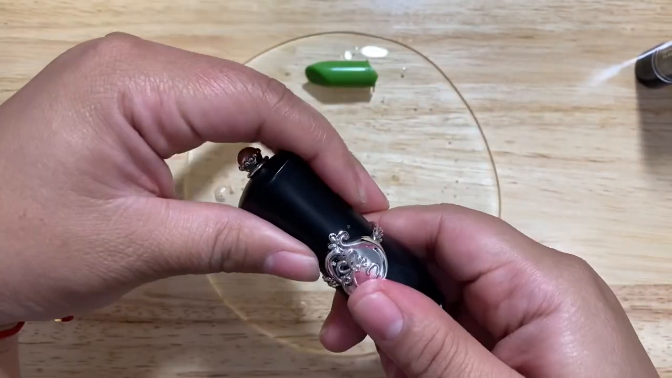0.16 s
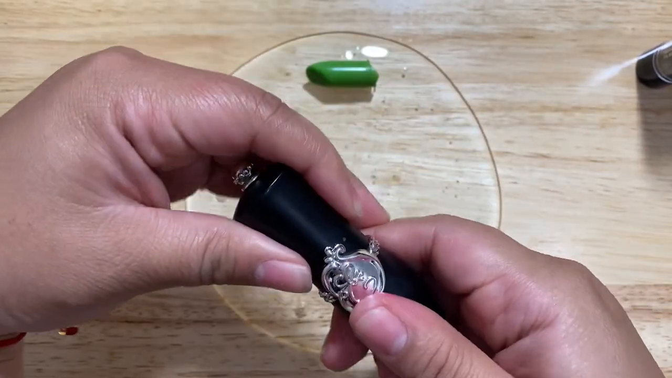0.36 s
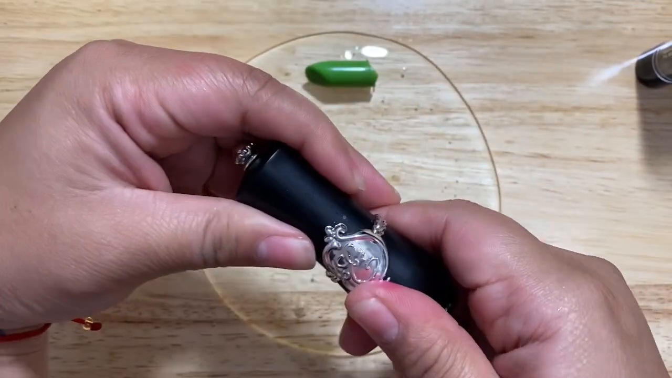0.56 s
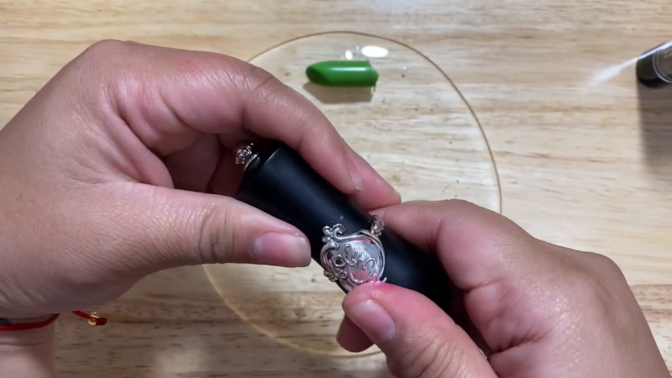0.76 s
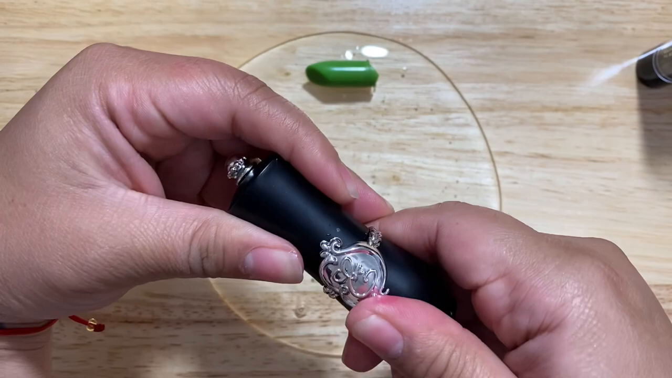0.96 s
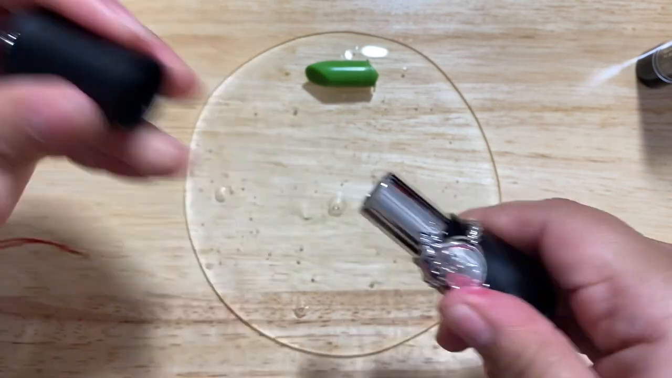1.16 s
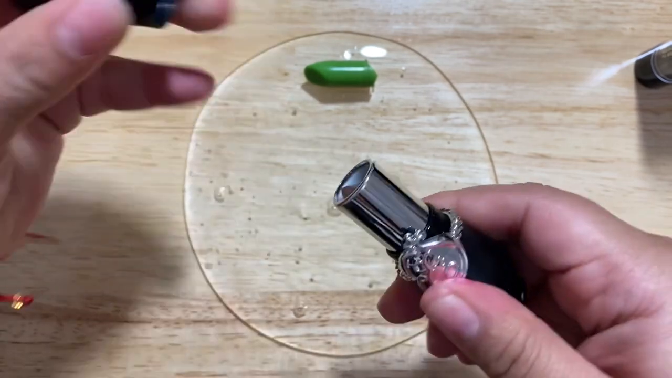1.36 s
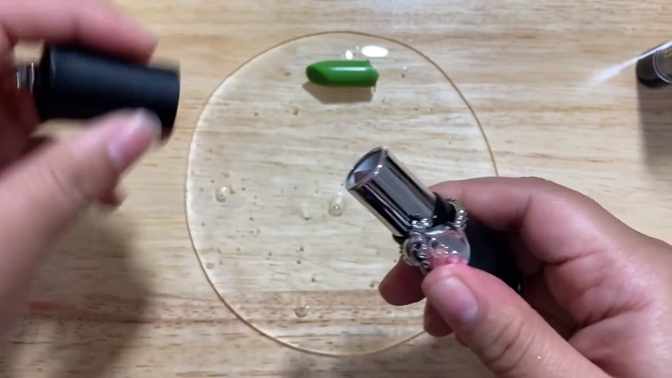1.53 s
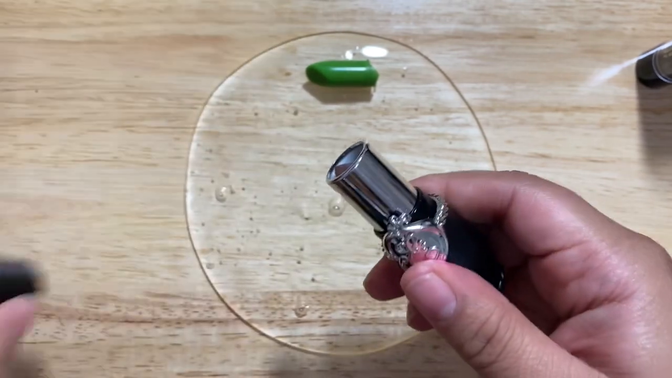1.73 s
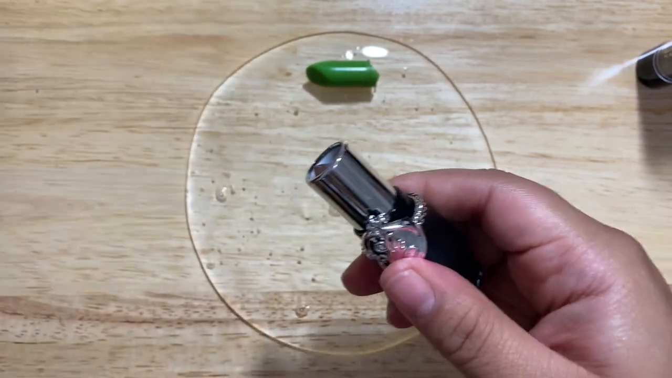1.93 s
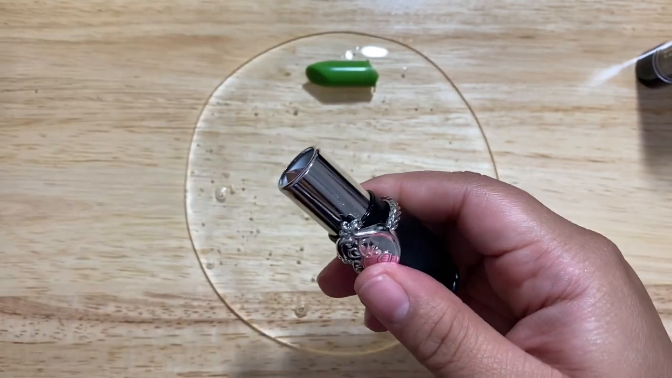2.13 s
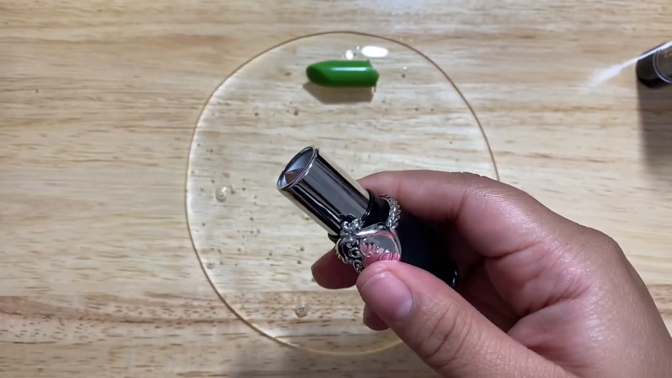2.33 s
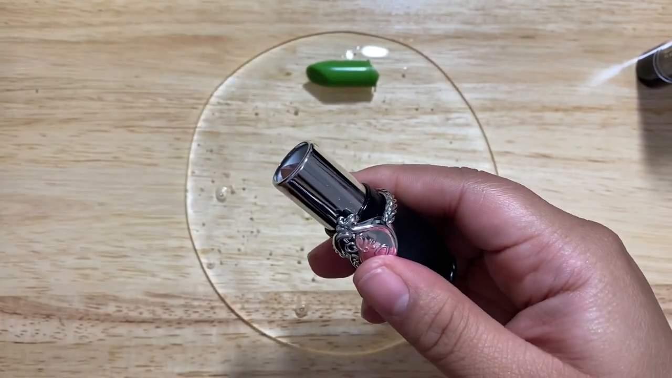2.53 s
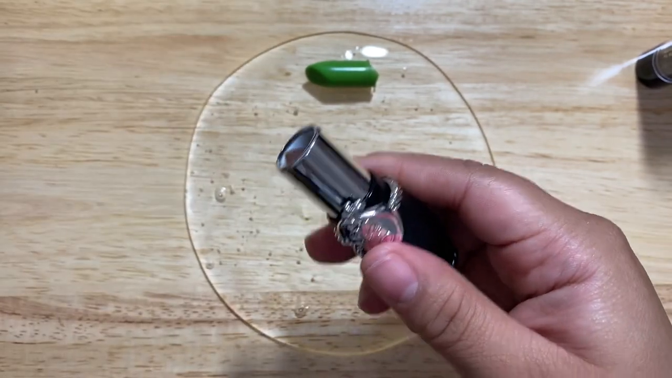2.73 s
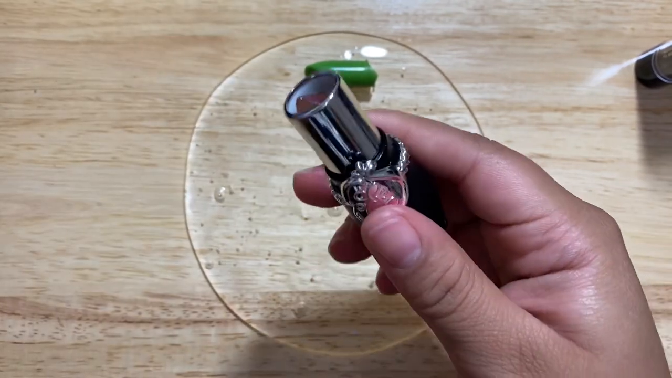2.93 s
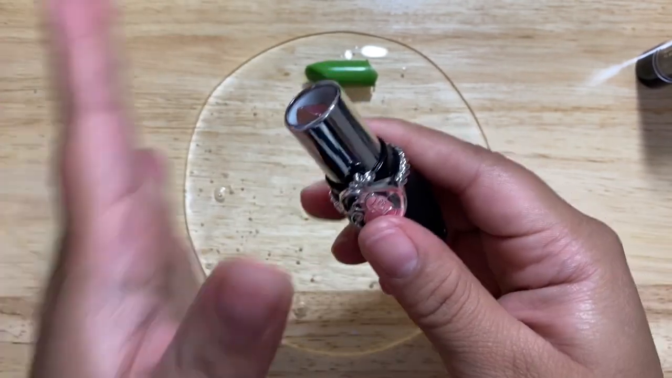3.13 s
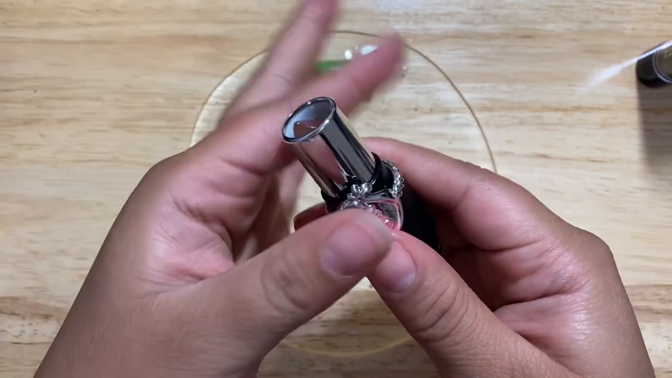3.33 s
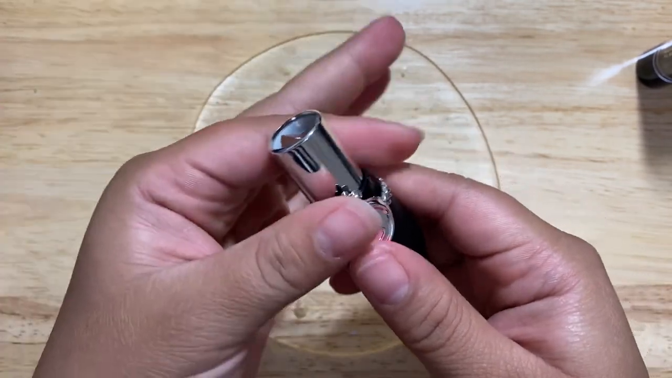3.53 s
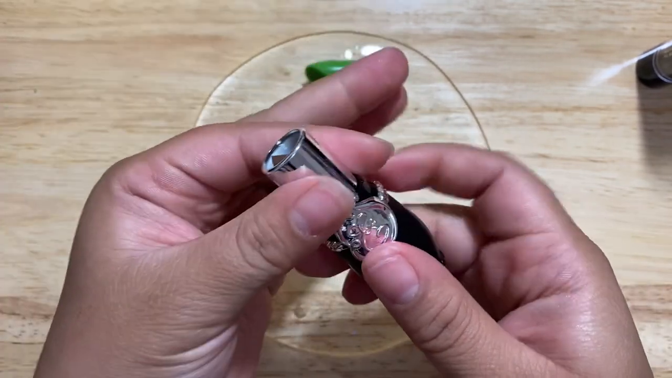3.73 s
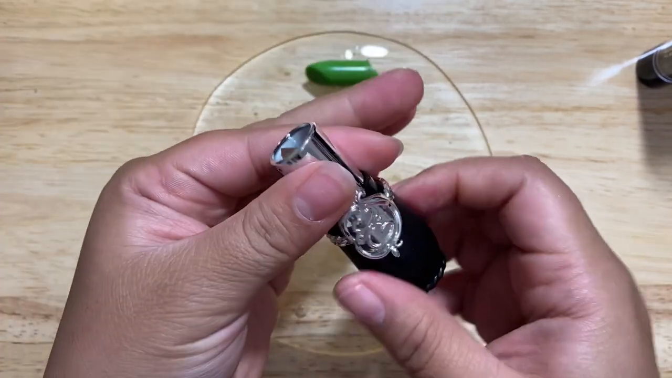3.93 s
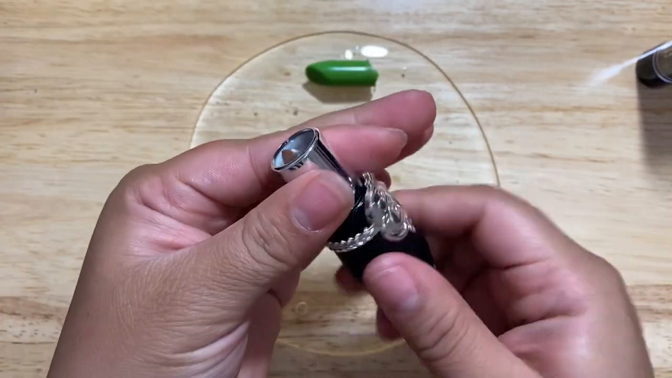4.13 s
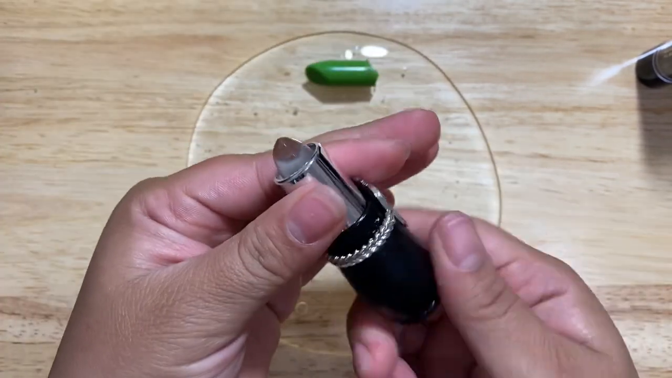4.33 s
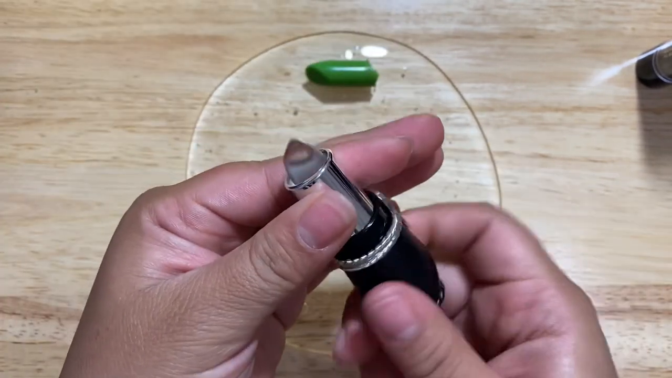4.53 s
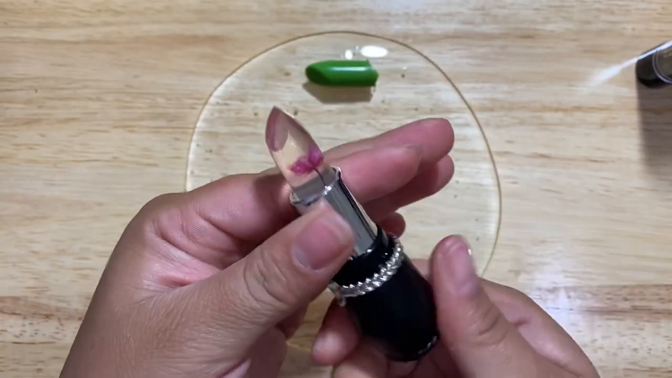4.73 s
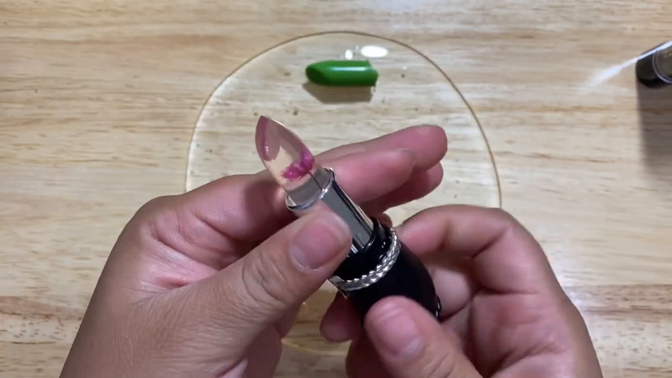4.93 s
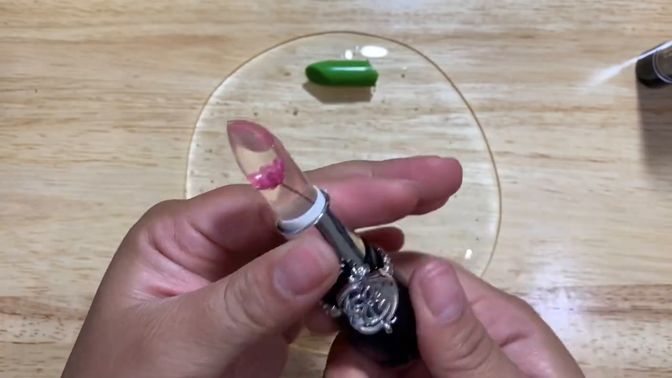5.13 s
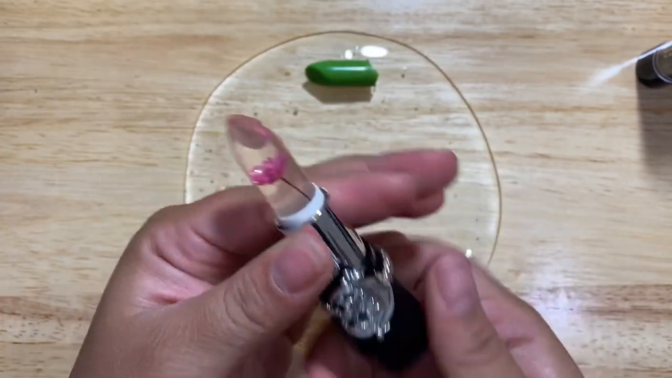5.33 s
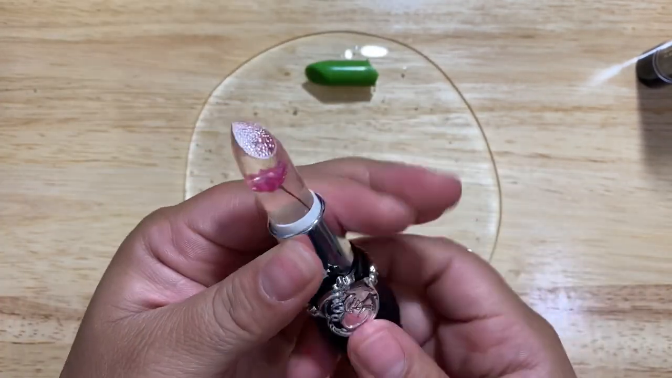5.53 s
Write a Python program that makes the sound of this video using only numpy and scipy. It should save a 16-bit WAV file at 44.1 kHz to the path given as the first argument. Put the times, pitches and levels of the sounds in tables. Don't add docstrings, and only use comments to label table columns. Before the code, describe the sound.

A quiet small room, heard close through a stereo phone microphone, with a low wavering hum and soft bassy air throughout. Faint clicks and light finger touches occur from 0.15 to 0.55 s. At 0.8 s the cap creaks with a firm dull squeeze; around 0.98 s several sharp cracks crowd into a hollow airy pop, the main loud event with 2.15 s, followed by a loosening click at 1.01 s. Dull double bumps come at 1.26 s, with faint skin scraping to about 1.7 s. A bright metallic tap at 1.86 s begins the cap's landing on wood: hollow rocking knocks near 1.95 s, a strong low table thud with quick rebounds at 2.15 s, smaller knocks to 2.4 s. Then it is nearly still. Tiny ticks gather from 3.5 to 3.95 s, and fine hissing twists come in short strokes around 4.0-4.25, 4.5-4.7 and 4.9-5.25 s, with a faint click at 4.99 s. Echoes are short and abruptly cut.

```python
import sys
import numpy as np
from scipy import signal
from scipy.fft import rfft, irfft, next_fast_len
from scipy.io import wavfile
from scipy.ndimage import uniform_filter1d

SR = 44100
rng = np.random.default_rng(int(sys.argv[2]) if len(sys.argv) > 2 else 0)


def nominal_scale(level):
    x = np.asarray(level, float) / 20
    return 10 ** x


def put_to_file(sound):
    columns = np.atleast_2d(sound).T
    safe = np.clip(columns, -1, 1)
    whole_steps = np.round(safe * 32767)
    wavfile.write(sys.argv[1], SR, whole_steps.astype(np.int16))


N = 245637


def evened(x):
    return x / np.sqrt(np.mean(x ** 2) + 1e-20)


def read(points, hz):
    f, value = np.transpose(points)
    return np.interp(np.log(hz + 1), np.log(f + 1), value)


def add(mix, s, sound):
    part = mix[..., round(s * SR):][..., :sound.shape[-1]]
    part += sound[..., :part.shape[-1]]


def ringing(modes, size, soft):
    t = np.arange(size) / SR
    ring = np.zeros(size)
    for k, (hz, width, db) in enumerate(modes):
        envelope = (width * t) ** soft * np.exp(-np.pi * width * t)
        ring += (-1) ** k * nominal_scale(db) * envelope * np.sin(2 * np.pi * hz * t)
    return ring


def struck(x, ring):
    y = signal.fftconvolve(np.atleast_2d(x), ring[None], axes=1)[:, :len(ring)]
    return y / abs(y).max()


DULLED_DB = [-7.5, 3.5, 0.5]


def clicks(rows, case):
    size = 500
    near, far, t = np.zeros((2, N)), np.zeros(N), np.arange(size) / SR
    edge, tube, shell = case[4:], case[2:4], case[:2]
    rings = [ringing(modes, size=size, soft=0.91) for modes in (edge, tube, shell)]
    small = signal.butter(4, 1200, "high", fs=SR, output="sos")
    rings = signal.sosfilt(small, rings)
    shape = (t / 0.00059) ** 2 * np.exp(-t / 0.00036) + .06 * np.exp(-t / 0.0044)
    crackle = rng.standard_normal((len(rows), 2, size)) * shape
    snap = 1.4 * (np.arange(size) == [[20], [22]])
    for (s, db, edge_db, shell_db, room_db), (shared, other) in zip(rows, crackle):
        crack = snap + np.array([shared, 0.8 * shared + other])
        parts_db = np.array([edge_db, 0, shell_db])
        close = sum(nominal_scale(db + 9.0 + d) * struck(crack, r) for d, r in zip(parts_db, rings))
        add(near, s, nominal_scale([[-1.2], [1.2]]) * close)
        for part_db, ring in zip(parts_db + DULLED_DB, rings):
            add(far, s, nominal_scale(db + 10.0 + room_db + part_db) * ring / ring[abs(ring).argmax()])
    return near, far


# start in seconds, tube peak (3-8 kHz) in dB,
# then edge (8-16 kHz), shell (1-3 kHz) and room, all in dB relative to the tube.
SEAL = [
    (.7923, -55.5, 13, 2, -8),
    (.7940, -50.5, 8, -1.5, -5.5),
    (.9757, -48.5, 7, -2, -8.5),
    (.9804, -30.5, -2, -9, -16.5),
    (.9856, -34.5, 3.5, -6, -13),
    (.9874, -29.5, 10.5, -14.5, -13),
    (.9893, -39.5, -8, -9, -9),
]
CLICKS = [(0.148, -83, 1.5, 1, 0), (0.1968, -60, 3.5, -9, -9), (0.2254, -65, 5.5, -10, -16),
          (0.4097, -70, 11, 0.5, -14), (0.4455, -93, 24, 6, -14), (0.466, -77, -1, -28, -9.5),
          (0.487, -71, 11, -2, -3), (0.5182, -60, 1, 2, -12), (0.530, -88, 8, 3, -9),
          (0.5377, -79, 6, 7, 6), (0.8114, -48.5, 11, 7.5, -18.5), (0.946, -93, 2, -8, -5),
          (1.0104, -45.5, 6.5, 4.5, -11), (1.2027, -88, 12.5, 2.5, -9), (1.2589, -86, 18, 16, -7),
          (1.3647, -76.5, 16, 7, -20), (1.5494, -92, 9, 6, 7), (1.7135, -84.5, -1.5, 1.5, 2),
          (2.1454, -50, 3, -24, 3), (2.347, -59.5, -3, -4, -14), (2.3887, -63.5, -5, 4.5, -29),
          (2.488, -66, 8.5, -5, 10), (4.992, -67, -1, -7, -1.5)]
# pitch in Hz, width in Hz, level in dB.
CASE = [(2100, 1000, 6), (3100, 1600, 0.5), (4200, 2800, 4.5), (7020, 2700, -0.5), (8680, 560, 6),
        (10460, 2200, 4.5), (13200, 2500, 4), (15150, 2200, 0)]


def cap_clicks():
    return clicks(SEAL + CLICKS, CASE)


# start in seconds, peak in dB, pitch in Hz, number of cycles.
POPS = [
    (0.9819, -21, 320, 3),
    (0.9912, -25.5, 135, .8),
    (0.7965, -47, 220, 1.5),
    (0.8135, -44, 260, 1.5),
]


def pops():
    out = np.zeros(N)
    for s, db, hz, cycles in POPS:
        turns = np.arange(0, cycles, hz / SR)
        swell = np.sin(np.pi * turns / cycles) ** .5
        add(out, s, -nominal_scale(db) * np.sin(2 * np.pi * turns) * swell)
    return out


# start in seconds, tube peak in dB,
# then edge, shell and room in dB relative to the tube.
TAPS = [
    (1.8608, -36.5, 13, -7.5, -2.5),
    (1.863, -65, 1.6, 15.5, -4),
    (2.2928, -53, 9.9, -24, -9.5),
]
# pitch in Hz, width in Hz, level in dB.
RIM = [(2125, 450, 9), (1500, 400, 4.5), (4400, 870, 6), (5850, 2350, 2), (8400, 1400, 14),
       (12330, 4700, 12), (14300, 2800, 0.5), (13160, 1800, 5.5)]
RIM_RING = [(2013, 300, -6), (4400, 130, 4), (4840, 200, -6), (8050, 400, -0.5), (10300, 400, -7.5),
            (15520, 500, 7)]
RIM_RING_DB = -49


def rim_taps():
    near, far = clicks(TAPS, RIM)
    add(far, TAPS[0][0], nominal_scale(RIM_RING_DB) * ringing(RIM_RING, size=2000, soft=0))
    return near, far


# start in seconds, tube peak in dB, edge in dB relative to it.
TICKS = [(2.78, -77, 1), (3.5114, -94, 25.5), (3.516, -78.5, 11.5), (3.7187, -77, 12.5), (3.729, -75, 13),
         (3.7408, -84, 8), (3.779, -97, 15), (3.893, -86, 16), (3.9003, -59.5, 16), (3.9234, -56, 4),
         (3.936, -85, 13), (4.6833, -85, 8), (4.748, -91, 14), (5.101, -105, 13), (5.3723, -76, 5.5),
         (5.415, -74.5, -26.5)]
# pitch in Hz, width in Hz, level in dB.
THREAD = [(2620, 700, 9), (3700, 1000, 5.5), (5440, 1600, 4), (7170, 1150, -4.5), (8820, 730, 3),
          (10600, 1400, 1), (11840, 1300, -3), (15200, 3000, 9)]
TICK_SHELL_DB, TICK_ROOM_DB = -10, -14


def thread_ticks():
    ticks = [(*row, TICK_SHELL_DB, TICK_ROOM_DB) for row in TICKS]
    return clicks(ticks, THREAD)


def knocks(rows, modes):
    size = 4000
    near, far, t = np.zeros((2, N)), np.zeros(N), np.arange(size) / SR
    low, high = ringing(modes[:4], size=size, soft=0.48), ringing(modes[4:], size=size, soft=0.56)
    shape = (1 - np.exp(-t / 0.00062)) * np.exp(-t / 0.0014)
    rough = rng.standard_normal((len(rows), 2, size)) * shape
    contact = 7.0 * (np.arange(size) == 12)
    echo_low = low * np.exp(-t / 0.0049) / abs(low).max()
    echo_high = high * np.exp(-t / 0.0015) / abs(high).max()
    for (s, db, bright_db, pan_db, room_db), (shared, other) in zip(rows, rough):
        blow = contact + np.array([shared, 0.54 * shared + 0.8 * other])
        sound = nominal_scale(db) * (struck(blow, low) + nominal_scale(bright_db + 3.5) * struck(blow, high))
        add(near, s, sound * nominal_scale([[pan_db / 2], [-pan_db / 2]]))
        add(far, s, nominal_scale(db + room_db + 7) * (echo_low + nominal_scale(bright_db + 5) * echo_high))
    return near, far


# start in seconds, peak in dB, brightness in dB,
# left over right in dB, room in dB.
GRIPS = [
    (0.409, -63.5, -10.5, -12, 9.5),
    (0.518, -46.5, -4.5, -2, -5),
    (0.793, -49.5, -4.5, -6, -1.5),
    (0.811, -34.5, -14.5, -1, -9.5),
    (1.01, -42, -2, -11.5, -18),
    (1.399, -62, -10, -5, 6),
    (4.992, -56.5, -6.5, -3, 2.5),
]
SNAPS = [
    (.9822, -33.5, -5, -1, -8.5),
    (0.9886, -32, 6.5, -1, -11.5),
    (.998, -38, -4, -2, -5),
]
# pitch in Hz, width in Hz, level in dB.
HAND = [(350, 150, 8), (528.2, 170, 9.5), (740.8, 710, 4.5), (906, 97, -7), (1105, 450, 6),
        (1864, 400, -2.5), (2140, 1400, -2.5)]


def hand_blows():
    return knocks(GRIPS + SNAPS, HAND)


# start in seconds, peak in dB, brightness in dB,
# left over right in dB, room in dB.
THUDS = [
    (1.2568, -40, -17.5, 4, 0),
    (1.262, -40.5, -22, -4, -15),
    (1.269, -52, -6, -5, -9.5),
]
# pitch in Hz, width in Hz, level in dB.
THUD = [(332, 160, 7.5), (484, 71, 8.5), (640, 300, 6), (924, 57, -1), (1300, 310, -8), (1730, 670, -0.5),
        (2160, 1400, -2), (2930, 870, -17)]


def knuckle_thuds():
    return knocks(THUDS, THUD)


# start in seconds, peak in dB, brightness in dB,
# left over right in dB, room in dB.
KNOCKS = [
    (1.937, -47.5, -3, 7, 7),
    (1.957, -45.5, -12.5, 12.5, 0),
    (1.993, -49, -8.5, 12, -2),
    (2.01, -50, -7, 1, -15),
    (2.262, -46.5, -10, 8, 1),
    (2.272, -47, -9.5, 12, 6.5),
    (2.348, -51.5, -8, 14, 7.5),
    (2.392, -48.5, -8, 9, 0.3),
    (2.53, -70, 6, 2, 5.5),
]
# pitch in Hz, width in Hz, level in dB.
CAP = [(274, 150, 1.5), (372, 120, -4.5), (543, 37, 1.5), (650, 560, 3), (1115, 370, 3), (1464, 160, -2.5),
       (1700, 790, 1.5), (2080, 8200, 8)]


def cap_on_table():
    return knocks(KNOCKS, CAP)


# start in seconds, peak in dB, brightness in dB,
# left over right in dB, room in dB.
BOUNCES = [
    (2.1464, -36.5, 4, 9.2, -1.5),
    (2.151, -28.5, -33, 11.4, -3),
    (2.158, -46, -71, 3.7, 9),
    (2.166, -34, -30, 4.9, -10),
]
# pitch in Hz, width in Hz, level in dB.
TABLE = [(205.2, 76, 3.5), (336, 45, 1), (557, 51, 2.5), (710, 105, 1.5), (1020, 530, 12),
         (1315, 170, -6.5), (1510, 164, 3.5), (3100, 12000, 1.5)]


def table_bounces():
    return knocks(BOUNCES, TABLE)


def resonate(x, hz, width):
    turn = np.exp(2j * np.pi * np.cumsum(hz * np.ones(x.shape[-1])) / SR)
    r = np.exp(-np.pi * width / SR)
    smooth = signal.lfilter([(1 - r) ** 2], [1, -2 * r, r ** 2], x / turn)
    return 2 * (turn * smooth).real


PORT_HZ, PORT_STEP_HZ = 8700, 4700


def port_lag(hz):
    return np.pi + 2 * np.pi * (hz - PORT_HZ) / PORT_STEP_HZ


def coloured(points, same, lagged=False):
    frames, hz = N // 256 + 5, np.fft.rfftfreq(1024, 1 / SR)
    a, b, c, d, patches = rng.standard_normal((frames, 513, 5)).T
    patches = evened(uniform_filter1d(uniform_filter1d(patches, 12, 0), 10, 1))
    same = np.clip(read(same, hz), -1, 1)[:, None]
    left, other = a + 1j * b, c + 1j * d
    delay = np.exp(-1j * lagged * port_lag(hz))[:, None]
    z = np.array([left, same * left * delay + np.sqrt(1 - same ** 2) * other])
    z *= nominal_scale(read(points, hz)[:, None] + 0.21 * patches)
    return evened(signal.istft(z, nperseg=1024, noverlap=768)[1][:, :N])


# time of the peak in seconds, length in seconds,
# fizz in dB, dull scrape in dB, scrape centre in Hz.
SLIDES = [(0.012, 0.1, -97, -72, 4300), (.44, .08, -88, -93, 3500), (.972, 0.022, -80.5, -65, 4470),
          (1.175, 0.15, -99.5, -80.5, 3100), (1.264, 0.085, -96, -84, 2720), (1.42, 0.17, -85, -74.5, 3160),
          (1.57, 0.69, -97, -83.5, 3100), (1.72, 0.43, -92.5, -82.5, 3100), (2.505, 0.14, -83, -79.5, 3450),
          (2.81, 0.059, -90.5, -99, 3400), (2.92, 0.3, -91, -85.5, 3231)]
TWISTS = [(3.78, .05, -92, -99, 3300), (3.96, 0.081, -90, -93, 4200), (4.04, 0.43, -76, -81, 3800),
          (4.13, 0.13, -74.5, -74, 3930), (4.226, 0.053, -67.5, -93, 3450),
          (4.53, 0.14, -72.5, -70.5, 4700), (4.535, .05, -90, -72.5, 4940),
          (4.59, 0.12, -70.5, -82.5, 4400), (4.65, 0.19, -77, -90.5, 3623),
          (4.93, 0.16, -78.5, -82.5, 3550), (5.01, 0.09, -70.5, -75, 3580), (5.125, 0.081, -67, -90, 3700),
          (5.165, 0.067, -69.5, -89, 3757), (5.245, 0.093, -77, -93.5, 3300), (5.505, .05, -88, -99, 3450)]
# pitch in Hz, level in dB.
FIZZ = [(5000, -38.5), (7500, -9.5), (10000, -6.5), (12000, 2), (15700, 2.5), (16050, -24.5)]
SCRAPE = [(700, -19.5), (1500, 4), (3000, 3), (6000, 0), (8000, 7.5), (11000, 0)]
SLIDE_RISE, TWIST_RISE = 0.47, 0.46
SLIDE_FINEST_DB, TWIST_FINEST_DB = -13, -6.5
STROKE_EDGE_DB = -20
STROKE_FLATNESS = 1.5


def rubs():
    fizz, scrape, centre, finest = np.zeros((4, N)) + 1e-9
    slides, twists = (SLIDES, SLIDE_RISE, SLIDE_FINEST_DB), (TWISTS, TWIST_RISE, TWIST_FINEST_DB)
    for rows, rise, finest_db in (slides, twists):
        for s, length, db, scrape_db, hz in rows:
            t = np.arange(max(-rise * length, -s), (1 - rise) * length, 1 / SR)
            from_peak = np.maximum(-t / rise, t / (1 - rise)) / length
            speed = nominal_scale(STROKE_EDGE_DB * from_peak ** STROKE_FLATNESS)
            add(fizz, s + t[0], nominal_scale(db) * speed)
            add(finest, s + t[0], nominal_scale(db + finest_db) * speed)
            add(scrape, s + t[0], nominal_scale(scrape_db) * speed)
            add(centre, s + t[0], nominal_scale(scrape_db) * speed * hz)
    slips = nominal_scale(1.9 * evened(uniform_filter1d(rng.standard_normal(N), 200)))
    close = [(100, 0.8), (16000, 0.44)]  # (Hz, left-right likeness)
    rasp = coloured(SCRAPE, close, lagged=True)
    rasp = 0.63 * rasp + 2.8 * resonate(rasp, centre / scrape, 2300)
    hiss = coloured(FIZZ, close, lagged=True)
    top = resonate(hiss, 13000, 2300)
    return slips * (fizz * (hiss - top) + 1.4 * finest * evened(top) + scrape * rasp)


# pitch in Hz, seconds to fall by 60 dB.
ROOM = [(150, 0.37), (500, 0.29), (1500, 0.31), (4000, 0.34), (8000, 0.55), (16000, 0.34)]


def room(x):
    size = SR // 2
    taps = np.zeros((2, size))
    at = np.arange(200, size - 20, 20)
    at = at + rng.integers(0, 20, (2, len(at)))
    np.put_along_axis(taps, at, rng.choice([-1., 1.], at.shape), 1)
    hz, t, z = signal.stft(taps, SR, nperseg=256)
    shut = np.clip((.195 - t) / 0.038, 0, 1)
    shut *= 1 - .8 * np.exp(-t / 0.0046)
    decay = nominal_scale(-60 * t / read(ROOM, hz)[:, None])
    tail = signal.istft(z * decay * shut, SR, nperseg=256)[1][:, :size // 2]
    return signal.oaconvolve(x[None], tail / np.linalg.norm(tail[0]), axes=1)[:, :N]


DRIFT_PER_S = 3.1


def shifting_room(x):
    turn = np.pi * DRIFT_PER_S * np.arange(N) / SR
    return sum(room(x * np.sqrt(2 / 3) * np.cos(turn + k * np.pi / 3)) for k in range(3))


# time in seconds, pitch in Hz, level in dB.
HUM = [(0.0, 59.7, -57.5), (0.329, 56.5, -76), (0.418, 51.15, -49.5), (1.711, 50.6, -57),
       (1.92, 51.36, -60), (2.42, 51.7, -45.5), (2.601, 52, -69), (2.85, 48.71, -55), (3.38, 52.33, -53.5),
       (3.57, 55.1, -56), (3.66, 53.3, -52), (4.219, 51.07, -50.5), (4.24, 51.46, -71.5),
       (4.73, 54.93, -42), (4.79, 55.16, -67), (4.999, 55.57, -59.5), (5.46, 48.24, -50),
       (5.57, 49.24, -64)]
# pitch in Hz, width in Hz, level in dB.
AIR_PEAKS = [(52, 22, -59), (107.6, 28, -58.5), (152.4, 74, -65.5), (235, 61, -67.5), (1320, 400, -90.5),
             (3300, 700, -99)]
# pitch in Hz, level in dB per Hz.
AIR = [(22, -46.5), (40, -13.5), (59, -7), (80, -12), (114, -10.5), (160, -12), (242, -21), (400, -25),
       (700, -36), (1300, -45), (2200, -53), (7500, -60), (12300, -68), (13500, -73)]
# pitch in Hz, likeness from 0 to 1.
SAME = [(60, 1), (130, 0.93), (290, 0.64), (640, 0.32), (1410, 0.087), (3100, 0.087), (6820, 0.02),
        (15000, 0.19)]
AIR_DB = -54


def air():
    s, hz, db = np.transpose(HUM)
    t = np.arange(N) / SR
    phase = 2 * np.pi * np.cumsum(np.interp(t, s, hz)) / SR
    low = nominal_scale(np.interp(t, s, db)) * np.sqrt(2) * np.sin(phase)
    for f, width, tone_db in AIR_PEAKS:
        low = low + nominal_scale(tone_db) * evened(resonate(rng.standard_normal(N), f, width))
    return low + nominal_scale(AIR_DB - 3.5) * coloured(AIR, SAME)


def scene():
    hits = (cap_clicks(), thread_ticks(), rim_taps(), hand_blows(), cap_on_table(), table_bounces(),
            knuckle_thuds())
    near, far = map(sum, zip(*hits))
    pop = pops()
    near = near + nominal_scale([[-2.5], [1.]]) * pop
    echo = shifting_room(far + nominal_scale(-13.5) * pop)
    return near + echo + rubs() + air()


GATE_HZ = [13800, 14500, 15100, 15900, 17000]
GATE_DB = [-110, -113, -114, -99]


def gate(x):
    hz, t, z = signal.stft(x, SR, nperseg=1024)
    band = np.digitize(hz, GATE_HZ)
    for k in range(1, len(GATE_HZ)):
        power = np.mean(abs(z[:, band == k]) ** 2, (0, 1))
        level_db = 10 * np.log10(uniform_filter1d(power, size=3) + 1e-20)
        z[:, band == k] *= np.clip((level_db - GATE_DB[k - 1]) / 3, 0, 1)
    return signal.istft(z, SR, nperseg=1024)[1][:, :N]


def top_cut(x):
    return signal.sosfilt(signal.butter(12, 16620, fs=SR, output="sos"), x)


# pitch in Hz, left over right in dB.
LEAN = [(60, 3), (180, 3), (550, 1.0), (1650, 0), (4970, -3.5), (15000, 3.5)]
SHARED_HZ = 6700
TOP_HZ, BOTTOM_HZ = 16100, 34


def record(dry):
    size = next_fast_len(N + 4000)
    padded = np.pad(dry, [(0, 0), (2000, size - N - 2000)], "reflect", reflect_type="odd")
    left, right = rfft(padded, size)
    hz = np.fft.rfftfreq(size, 1 / SR)
    shared = np.pi / 2 * np.sin(np.pi / 2 * np.clip((hz - SHARED_HZ) / 1800, 0, 1)) ** 2
    right = np.cos(shared) * right + np.sin(shared) * left * np.exp(-1j * port_lag(hz))
    lean = nominal_scale(read(LEAN, hz) / 2 * np.cos(shared))
    falloff = np.sqrt(1 + (hz / TOP_HZ) ** 200 + (BOTTOM_HZ / (hz + 1)) ** 14)
    ports = np.array([left * lean, right / lean]) / falloff
    heard = irfft(ports, size)[:, 2000:N + 2000]
    return top_cut(gate(heard))


dry = scene()
out = record(dry)
put_to_file(out)
```